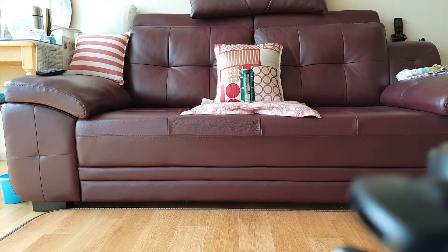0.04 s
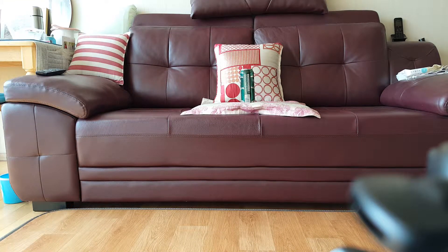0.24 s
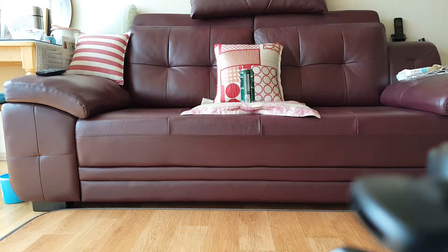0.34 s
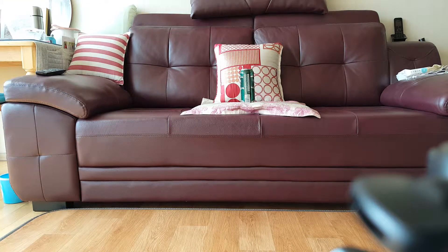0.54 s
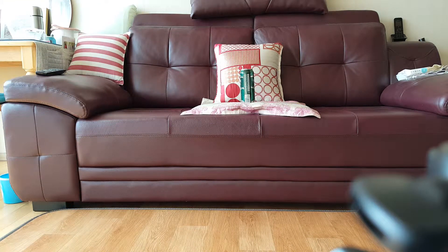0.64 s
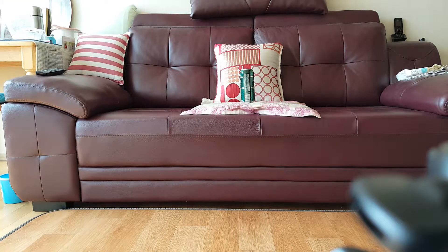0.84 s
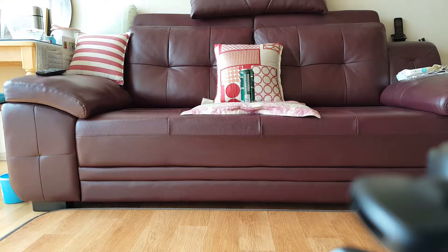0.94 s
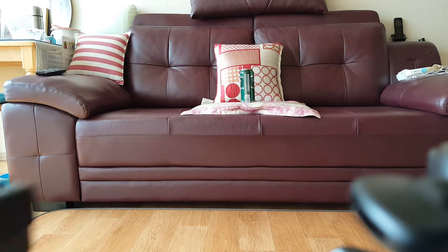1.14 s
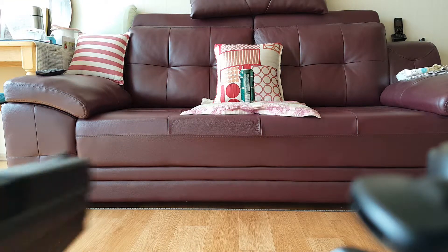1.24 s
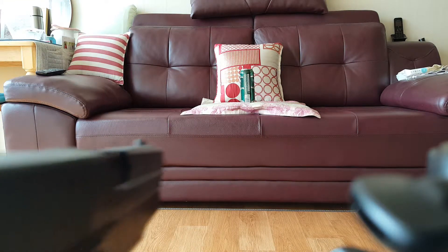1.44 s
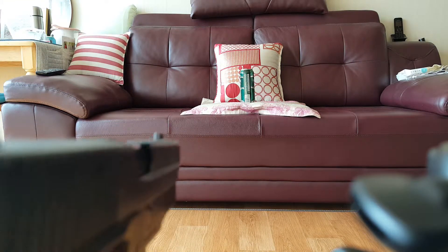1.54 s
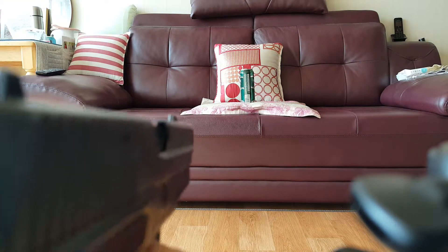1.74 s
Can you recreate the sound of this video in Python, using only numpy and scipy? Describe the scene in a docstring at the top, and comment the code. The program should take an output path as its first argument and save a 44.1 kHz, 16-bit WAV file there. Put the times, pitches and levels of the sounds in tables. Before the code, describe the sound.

A toy pistol is cocked close to the microphone in a quiet living room. Its plastic slide clacks back, then scrapes forward and snaps shut. A lighter double click and faint handling ticks follow.

```python
"""Small plastic clicks and a scrape: a toy pistol is cocked close to the microphone in a quiet living room.
The slide draws back and latches with a clack, then runs forward and slams home; a lighter double click
and faint handling ticks follow. Every contact is a few milliseconds of chatter that rings the hollow
shell, and the room answers."""
import sys
import numpy as np
from scipy import signal
from scipy.fft import rfft, irfft
from scipy.io import wavfile

SR = 44100
rng = np.random.default_rng(int(sys.argv[2]) if len(sys.argv) > 2 else 0)


def materialize(psi):
    """Save the field psi as 16-bit PCM at rate SR to the path in sys.argv[1].

    A 1-D psi becomes a single channel; in a 2-D psi each row is a channel.
    """
    bounded = np.clip(np.atleast_2d(psi).T, -1, 1)
    quanta = np.round(bounded * 32767).astype(np.int16)
    wavfile.write(sys.argv[1], SR, quanta)


N = 79380
T = np.arange(N) / SR
PORTS_ALIKE_BELOW_HZ, CUTOFF_HZ = 540, 16000  # the stereo microphone


def from_db(db):
    """Decibels to gain."""
    return 10 ** (np.asarray(db) / 20)


def rms_one(x):
    """Scale to unit rms."""
    return x / np.sqrt(np.mean(x ** 2) + 1e-20)


def at_hz(hz, points_hz, values):
    """Read a table on a log-frequency axis."""
    return np.interp(np.log(np.maximum(hz, 1)), np.log(points_hz), values)


def resonate(x, hz, width_hz):
    """A damped resonance with gain 1 at its peak."""
    radius = np.exp(-np.pi * width_hz / SR)
    feedback = [1, -2 * radius * np.cos(2 * np.pi * hz / SR), radius ** 2]
    return signal.lfilter(np.array([1, 0, -1]) * (1 - radius ** 2) / 2, feedback, x + 1e-18)


def diffuse_spectra(alike_below_hz):
    """White noise spectra at the microphone's two ports, alike in the bass, unrelated in the treble."""
    hz = np.arange(N // 2 + 1) * SR / N
    mid, side = rfft(rng.standard_normal((2, N)))
    alike = 1 / (1 + (hz / alike_below_hz) ** 2)
    return hz, (np.sqrt(1 + alike) * mid + np.sqrt(1 - alike) * side * [[1], [-1]]) / np.sqrt(2)


def chatter(length_s, attack_s=0.00013, release_s=0.0005):
    """Parts chatter as they meet: two unrelated bursts of force, each of unit energy."""
    t = np.arange(2048) / SR
    envelope = (1 - np.exp(-t / attack_s)) * np.exp(-np.maximum(t - length_s, 0) / release_s)
    force = rng.standard_normal((2, len(t))) * envelope
    for _ in range(3):  # even out the spectrum
        force = irfft(np.exp(1j * np.angle(rfft(force)))) * envelope
    return force / np.sqrt(np.sum(force ** 2, axis=1, keepdims=True))


def shell(force, thud_db, hollow_db, bright_db, treble_likeness=0.43):
    """The hollow shell rings in the contact's colour; higher modes reach the two ports less alike."""
    # damped resonances of the plastic: (f/Hz, width/Hz, relative level/dB)
    modes = [(295, 140, -10.5), (494, 170, -8.5), (834.3, 226, -4.5), (1083, 121, 3), (1275, 150, 0.5),
             (1593, 180, 1.5), (1920, 290, -1.5), (2280, 330, -1), (3480, 900, -7.5), (5320, 1100, -10),
             (6610, 1000, -10.5), (8228, 834, -9), (11500, 2000, -20), (14100, 3400, -24)]
    colour_hz = [390, 1105, 1300, 2270, 6400]
    colour_db = [thud_db, hollow_db, 0, 0, bright_db]
    ring = 0
    for k, (hz, width_hz, db) in enumerate(modes):
        gain = from_db(db + at_hz(hz, colour_hz, colour_db))
        alike = treble_likeness + (1 - treble_likeness) / (1 + (hz / PORTS_ALIKE_BELOW_HZ) ** 2)
        ports = np.array([force[0], alike * force[0] + np.sqrt(1 - alike ** 2) * force[1]])
        ring = ring + (-1) ** k * gain * resonate(ports, hz, width_hz)
    return ring


def clacks():
    """Each contact of the parts drives the shell with one short burst of chatter."""
    # contacts: (t/s, force level/dB, chatter/ms, thud/dB, hollow ring/dB, brightness/dB, left-right/dB)
    contacts = [ (.002, -6.5, 3.6, -8, -1, -8, 3), (0.0203, -14, 2.4, -7, -18, -5.5, -0.5),
                (.072, -6.5, 5, 2, -10, 2.5, -2), (0.1162, -12.5, 2.9, 4, -3, 5, 0.5),
                (.139, -7.5, 4, 9, 4, -8, 1), (.177, -13, 2.4, -9, -1, 4.5, -8.5),
                (.196, 0.5, 2.65, -20, -2, -17, -0.5), (0.213, 19.5, 3.66, -14.5, -7, 1, 4.5),
                (0.2173, -2, 4.5, 5.5, -10.5, 16, -1), (.385, -8.5, 6.5, 7, 3.5, -4, -6.5),
                (0.4105, 2, 3.27, -5.5, -14.5, -4.5, 3.5), (0.463, -15, 2.5, 10.5, 12.5, -16, 1.5),
                (.474, -10.5, 2.5, 6.5, 6.5, -4.5, 2.5), (0.4837, -1, 5.7, -4.5, 2, 0.5, 0.5),
                (.491, -1.5, 6.3, -7.5, -2, -4, 13), (.508, 8.5, 4.14, -8, -0.5, 3, 8),
                (0.5208, 3, 6.1, 0.5, -12, 7, 3.5), (.525, 5.5, 5.3, 11, -1, 9, -10),
                (.5323, 15.5, 4.5, 2.5, 0, -0.5, 6), (1.023, -0.5, 4.16, -0.5, 0.5, -0.5, 5.5),
                (1.0431, -4, 3.6, 5.5, 1.5, -4.5, 3), (1.096, -7.5, 3.5, -13, 0.5, -8, 6.5),
                (1.18, -26.5, 3.9, -5, 1.5, -17, 1), (1.325, -30.5, 5.8, 5.5, 0, -6.5, 5),
                (1.379, -28.5, 2.8, 3.5, -4, -7.5, 8.5), (1.542, -30.5, 3.1, 7.5, -1.5, -12.5, 3),
                (1.72, -28, 2.5, -3.5, -5.5, -12.5, 5), (1.749, -31, 3.6, -4.5, -5, -13, 4.5)]
    out = np.zeros((2, N + SR))
    for start_s, db, length_ms, thud_db, hollow_db, bright_db, pan_db in contacts:
        ring = shell(chatter(length_ms / 1000), thud_db, hollow_db, bright_db)
        start = int(start_s * SR)
        out[:, start:start + ring.shape[1]] += ring * from_db([[db + pan_db / 2], [db - pan_db / 2]])
    return out[:, :N]


def slide_rub(slips_per_s=1500, spread_db=4.5):
    """The slide scrapes on its rails: tiny slips of plastic on plastic drive the same shell."""
    # friction on the rails: (t/s, force level/dB)
    friction = [(0, -37), (.1, -47), (.19, -40), (.25, -55), (.4, -46.5), (.46, -50.5), (.52, -22),
                (.56, -73.5), (1.8, -79.5)]
    slips = (rng.random((2, N)) < slips_per_s / SR) * rng.choice([-1, 1], (2, N))
    sizes = from_db(-spread_db * np.minimum(rng.exponential(1, (2, N)), 4))
    force = rms_one(slips * sizes) * from_db(np.interp(T, *np.transpose(friction)))
    return shell(force, thud_db=-0.5, hollow_db=0, bright_db=-1.5)


def living_room(pistol, delay_s=0.0016, build_s=0.0034, tail_db=-2, echo_cut_hz=2400):
    """The room answers with a few dull echoes and a diffuse tail that dies band by band."""
    # reverberation: (f/Hz, t60/s, relative level/dB)
    reverberation = [(150, .4, -5), (352, 0.52, -6), (710, 0.49, -9), (1510, 0.52, -5.5), (3467, .46, -2.5),
                     (8000, 0.44, -4.5), (9880, .37, -2.5), (15000, 0.18, -3.5)]
    # echoes off floor and walls: (delay t/s, level/dB)
    echoes = [(0.0112, -21), (.018, -16), (0.026, -17)]
    points_hz, t60s, levels_db = np.transpose(reverberation)
    hz, noise = diffuse_spectra(PORTS_ALIKE_BELOW_HZ)
    centres = np.geomspace(100, CUTOFF_HZ, 20)
    build = 1 - np.exp(-np.maximum(T - delay_s, 0) / build_s)
    response = 0
    for centre, share in zip(centres, np.eye(len(centres))):
        decay = build * np.exp(-np.log(1000) * T / at_hz(centre, points_hz, t60s))
        band = irfft(noise * at_hz(hz, centres, share), N)
        gain = from_db(at_hz(centre, points_hz, levels_db))
        response = response + gain * band * decay / np.linalg.norm(decay)
    wet = signal.fftconvolve(pistol[:1], response, axes=1)[:, :N] * from_db(tail_db)
    dull = signal.sosfilt(signal.butter(1, echo_cut_hz, fs=SR, output="sos"), pistol)
    for echo_s, db in echoes:
        wet += from_db(db) * np.pad(dull, ((0, 0), (int(echo_s * SR), 0)))[:, :N]
    return wet


def room_tone(air_db=-65.5, rumble_hz=41.8, rumble_width_hz=12):
    """Steady air noise all round, and a faint deep rumble that swells while the slide is worked."""
    # spectrum of the room's air: (f/Hz, relative level/dB)
    air_spectrum = [(15, -40), (25, -15), (53, -4), (84, -2.5), (149, -3.5), (277, -15.5), (394, -14),
                    (796, -18.5), (1070, -19.5), (1400, -22.5), (2110, -23), (3340, -30), (16000, -36.5)]
    # swell of the rumble: (t/s, level/dB)
    swell = [(0, -71), (.15, -83), (.24, -68.5), (.45, -67), (.54, -92.5), (1.8, -84.5)]
    hz, noise = diffuse_spectra(alike_below_hz=400)
    air = irfft(noise * from_db(at_hz(hz, *np.transpose(air_spectrum))), N)
    rumble = rng.standard_normal(N)
    for _ in range(2):
        rumble = resonate(rumble, rumble_hz, rumble_width_hz)
    rumble_db = np.interp(T, *np.transpose(swell))
    return from_db(air_db) * rms_one(air) + from_db(rumble_db) * rms_one(rumble)


def scene(left_lead_s=0.00018):
    """The pistol close up, a little left of the microphone, with the living room around it."""
    left, right = clacks() + slide_rub()
    late_right = np.pad(right, (int(left_lead_s * SR), 0))[:N]
    pistol = np.array([left, late_right])
    return pistol + living_room(pistol) + room_tone()


def record(dry):
    """The microphone dips just under 10 kHz and cuts the very top."""
    dip = 0.41 * resonate(dry, hz=9800, width_hz=1500)
    return signal.sosfilt(signal.ellip(10, .1, 70, CUTOFF_HZ, fs=SR, output="sos"), dry - dip)


dry = scene()
out = record(dry)
materialize(out)
```